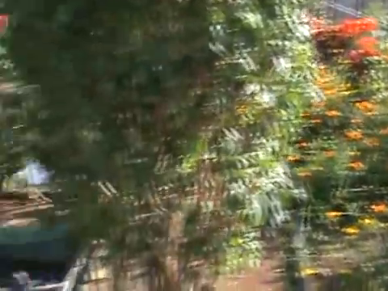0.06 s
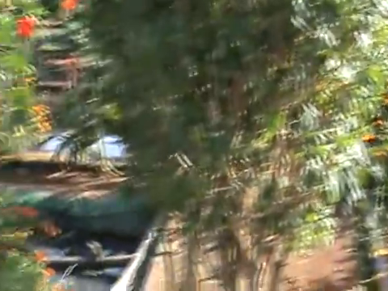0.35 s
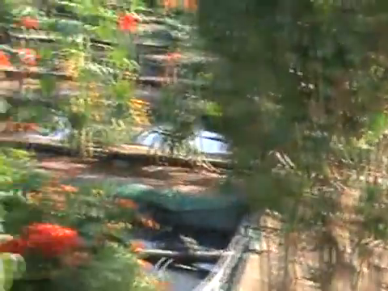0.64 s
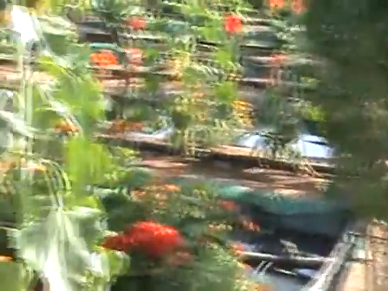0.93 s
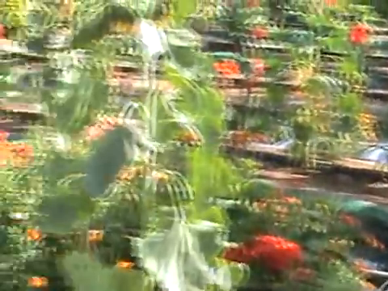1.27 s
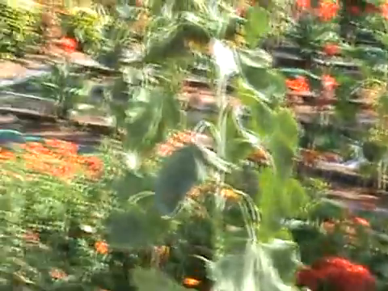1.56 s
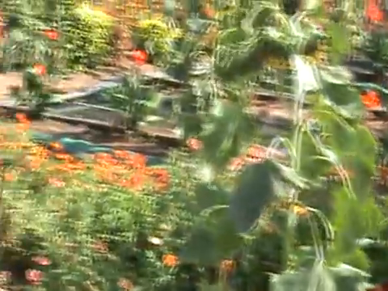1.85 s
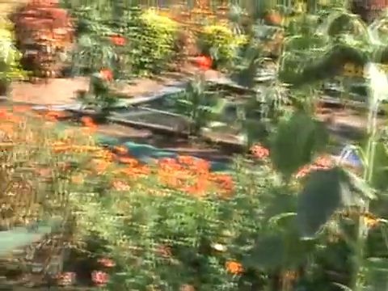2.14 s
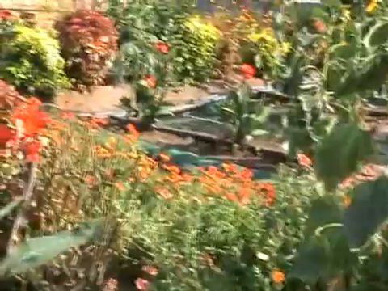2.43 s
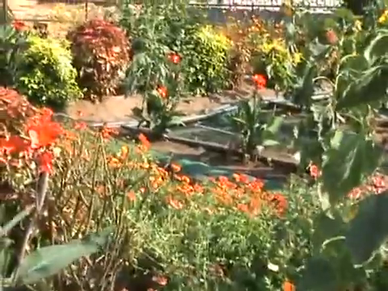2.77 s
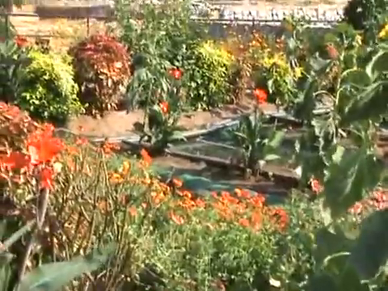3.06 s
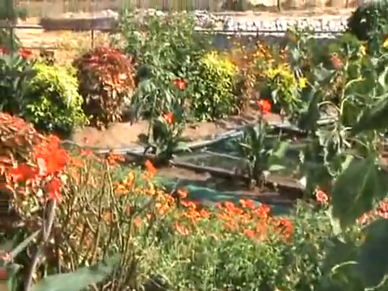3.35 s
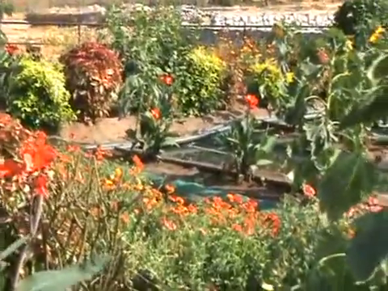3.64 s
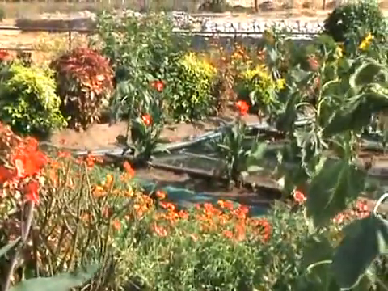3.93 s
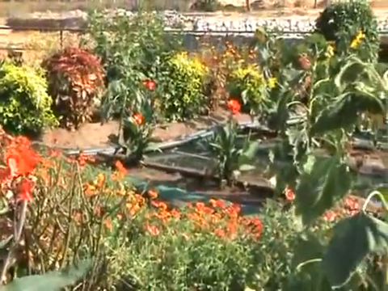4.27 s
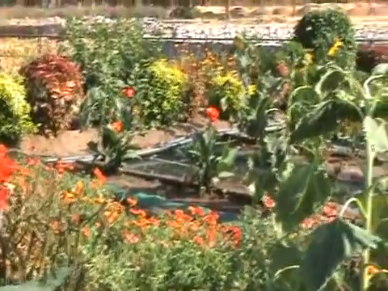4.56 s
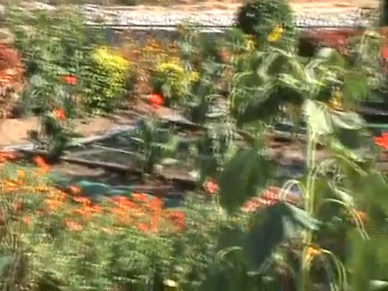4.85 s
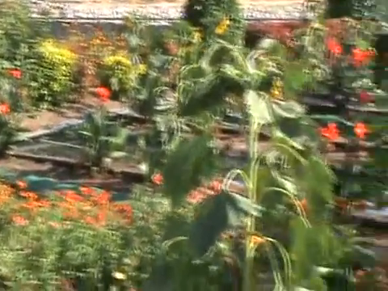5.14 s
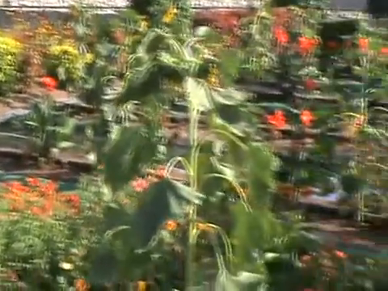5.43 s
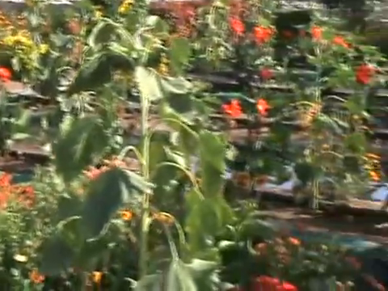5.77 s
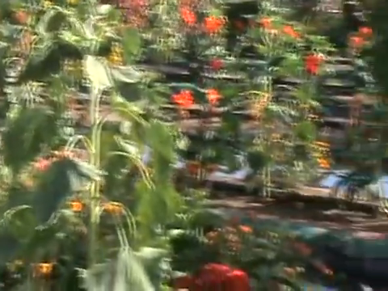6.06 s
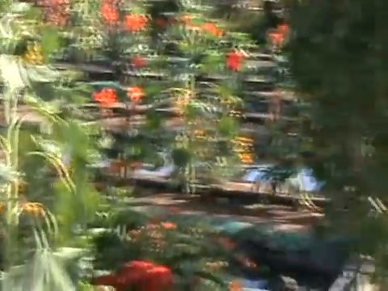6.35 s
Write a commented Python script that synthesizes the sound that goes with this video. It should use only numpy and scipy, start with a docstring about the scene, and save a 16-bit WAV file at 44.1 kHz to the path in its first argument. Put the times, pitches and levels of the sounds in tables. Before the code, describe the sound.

Water pours and splashes steadily outdoors among planted beds for about six and a half seconds. A high hiss of spray and fine drops flutters and surges over a bubbling rush and a deep, uneven churn that burbles and briefly drops out. For the first second the water is duller and boxier, screened by a bush. It grows brighter and a little louder until about 2.5 seconds, with a slightly hollow middle, holds there, then eases after 5.6 seconds. Small wet slaps, ringing drips, sharp little ticks and faint gulps are scattered through the flow, with a clearer tick at 1.2 seconds and a plink near 2.2. Light wind rumbles on the hand-held microphone, with a puff and soft handling bumps around 0.5 to 0.6 seconds, another bump near 4.1, and weaker puffs in between and near 4.5.

```python
"""Outdoors by planted beds, water pours and splashes steadily: a surging high hiss of spray and drops
over a rush of ringing bubbles and a deep churn. A bush screens the treble at first; the echo off a hard
surface close to the microphone hollows the midrange. Light air and the moving hand rumble on the
hand-held microphone, and the camera's noise suppressor makes the low water burble."""
import sys
import numpy as np
from scipy import signal
from scipy.fft import rfft, irfft, next_fast_len
from scipy.io import wavfile
from scipy.ndimage import uniform_filter1d, map_coordinates

SR = 44100
rng = np.random.default_rng(int(sys.argv[2]) if len(sys.argv) > 2 else 0)


def waveform_to_disk(signal):
    """Save audio, clipped to [-1, 1], as 16-bit WAV at the path in sys.argv[1]."""
    frames = np.transpose(np.atleast_2d(signal))
    scaled = np.clip(frames, -1, 1) * 32767
    samples = np.round(scaled).astype(np.int16)
    wavfile.write(sys.argv[1], SR, samples)


N = 282240


# the bright colour of the spray: f/Hz, level/dB
SPRAY_COLOUR = [(250, -33), (1500, -8.5), (2200, -5), (3050, -4), (3500, -1), (4500, 0.5), (5300, 1.2),
                (6900, 3.5), (8200, 2.5), (9000, -1), (9800, -12), (11000, -22), (13000, -45), (14500, -70)]
# the spray comes out from behind the bush and recedes again: t/s, level/dB
SPRAY_FADER = [(0, -26.5), (.75, -26), (1.5, -24), (2.2, -22.5), (2.5, -21.5), (3.2, -21.5), (4.1, -22.5),
               (5.6, -22.5), (6.4, -25)]
def spray(flow_db):
    """Drops tick on a sheet of hiss, the tiny bubbles they trap tinkle, and heavier drops patter."""
    drops = grains(2360, 7960, cycles=0.63, heft_db=0, rise=0.028, count=16000, samples=70)
    tinkle = grains(1803, 8980, cycles=33, heft_db=0.5, rise=0.0014, count=3200, samples=600)
    patter = grains(1496, 6510, cycles=7, heft_db=1.5, rise=0.003, count=900, samples=500)
    hiss = patchy_noise(patchy_db=0.7) + amp(-6) * drops + amp(-8) * tinkle + amp(-14) * patter
    return stereo(hiss, SPRAY_COLOUR) * amp(curve(SPRAY_FADER) + flow_db + 0.29 * wobble(28))


# the airy top of the mist: f/Hz, level/dB
MIST_COLOUR = [(5000, -46), (8000, -10.5), (9000, 0.5), (9800, 2.2), (10900, 4), (11800, 0), (12500, -3),
               (13200, -9), (13700, -35), (14300, -48)]
# the mist opens up where no leaves are in the way: t/s, level/dB
MIST_FADER = [(0, -37), (.6, -38.5), (1.05, -34.5), (1.45, -31.5), (2.1, -36), (2.6, -30.5), (3.7, -31),
              (4.2, -29.5), (5, -30), (5.4, -31), (5.9, -32), (6.4, -35.5)]
def mist(flow_db):
    """The finest droplets sizzle above the spray; the leaves screen them most."""
    sizzle = stereo(patchy_noise(patchy_db=2.5), MIST_COLOUR)
    return sizzle * amp(curve(MIST_FADER) + flow_db + 0.54 * wobble(23.6))


# the rush in the open: f/Hz, level/dB
OPEN_COLOUR = [(250, -57), (340, -12), (390, -7), (455, 1.5), (570, 1), (660, 1.5), (850, 3.5), (1050, 1.5),
               (1300, 0), (1700, 0), (2100, 0), (2800, 0), (5000, -5), (9000, -60)]
# the duller, boxier rush from behind the bush: f/Hz, level/dB
SCREENED_COLOUR = [(250, -59), (340, -0.5), (410, -6), (600, -5), (800, -2.5), (1000, -5.5), (1170, -10),
                   (1400, -2.5), (1650, -8.5), (2000, -5.5), (2800, -5.5), (5000, -10), (9000, -60)]
def rush(flow_db, facing):
    """Crowds of short-lived bubbles ring in the froth, which follows the surges only in part."""
    bubbles = grains(1002.5, 3182, cycles=13.4, heft_db=0.6, rise=0.0055, count=2500, samples=900)
    burble = grains(382.3, 1101.6, cycles=20.6, heft_db=-1, rise=0.0059, count=700, samples=2000)
    froth = patchy_noise(patchy_db=1.1) + amp(-13) * bubbles + amp(-18.5) * burble
    coloured = facing * stereo(froth, OPEN_COLOUR) + (1 - facing) * stereo(froth, SCREENED_COLOUR)
    return coloured * amp(-30 + 0.58 * flow_db)


# the low body of the pour: f/Hz, level/dB
CHURN_COLOUR = [(60, -22), (120, -16.5), (165, -8.5), (220, -1), (290, 2), (350, 2.5), (440, 2), (520, 3),
                (900, -50)]
# the churn swells and sinks: t/s, level/dB
CHURN_FADER = [(0, -40), (.7, -41), (1.1, -42), (1.5, -38.5), (2.15, -40.5), (3, -45), (4, -41.5),
               (4.8, -43), (5.5, -45), (5.9, -39.5), (6.12, -40), (6.4, -43)]
def churn():
    """Large bubbles boil unevenly and glug in bursts around one deep pitch."""
    boil = stereo(patchy_noise(patchy_db=3.5), CHURN_COLOUR)
    level = amp(curve(CHURN_FADER) + 0.55 * wobble(16))
    bursts = 1 + np.tanh(1.8 * wobble(22))
    glugs = unit(bursts * narrow_noise(centre_hz=174.3, width_hz=42))
    return level * (boil + amp(-7) * glugs)


def gurgling(hz, t, power, depth_db=1.5, reach_hz=620):
    """Bubbles come in clumps: a gain that breaks the low water into lumps and gaps."""
    clumps = patches((len(hz), len(t)), bins=4, frames=8)
    gain = amp(depth_db * np.minimum(clumps, 1) / (1 + (hz / reach_hz) ** 4))
    return gain / np.sqrt(np.mean(gain ** 2, axis=1, keepdims=True))


# the flow spurts or slackens for a moment: t/s, change/dB, length/s
SPURTS = [(.177, -2, .018), (.262, 1.2, .02), (.405, -2.5, 0.017), (.635, 4, 0.014), (.7, -0.5, 0.042),
          (.759, 3.5, 0.0074), (1.08, 0.6, 0.052), (1.19, -2, .011), (1.41, 1.5, 0.019), (1.574, -2, .016),
          (1.9, 2.5, 0.016), (2.05, 0.5, .018), (2.13, -1.3, 0.048), (2.255, -4.5, 0.015),
          (2.3, -3, 0.0086), (2.47, 1.4, 0.032), (2.672, -1.6, .018), (2.92, 1.5, 0.016),
          (3.039, -1.5, 0.011), (3.27, 0.5, .018), (3.5, -2.5, .027), (3.712, 1, 0.013), (3.875, -3, 0.018),
          (4.356, -2, .02), (4.45, -2.5, 0.018), (4.633, -0.8, 0.013), (4.85, -2, 0.017),
          (4.962, -1, 0.013), (5.01, 2, .02), (5.28, -2.3, 0.041), (5.37, -3, 0.013), (5.555, 2, .02),
          (5.808, 2.5, 0.022), (6.023, -3, 0.014), (6.095, -4.5, 0.01), (6.145, 3.5, .02),
          (6.223, -2.5, .015), (6.275, 2.7, 0.011)]
def flow():
    """Spurts and landing clumps of water make the level surge, in dB per sample."""
    return sum(db * hump(s, length) for s, db, length in SPURTS) + 0.77 * wobble(120)


# accents of falling water: t/s, relative level/dB
SLAP_HITS = [(0.932, -11.5), (1.34, -12), (1.6297, -30), (2.045, -11), (2.212, -14), (3.68, -12.5),
             (3.911, -11), (4.48, -14), (5.5458, -11), (5.768, -13), (6.259, -10.5)]
# the wet smack of a slap: f/Hz, level/dB
SLAP_COLOUR = [(400, -25), (900, 1), (1400, 6), (3000, 10), (4500, 10), (8000, -2), (13000, -40)]
def slaps(attack_s=0.0045, trim_db=-11.5):
    """A lump of water bursts in a brief, fuller splash."""
    age = np.arange(SR // 10) / SR / attack_s
    envelope = np.zeros(N + len(age))
    for s, db in SLAP_HITS:
        envelope[int(s * SR):][:len(age)] += amp(db + trim_db) * age * np.exp(1 - age)
    return envelope[:N] * stereo(rng.standard_normal((2, N)), SLAP_COLOUR)


# close drops that ring clearly: t/s, level/dB, f/Hz
PLINKS = [(.755, -16, 6300), (1.411, -17, 1460), (1.63, -13, 3445), (1.891, -19, 3190), (2.22, -10, 4307),
          (2.447, -19, 3790), (3.914, -16, 2050), (4.012, -18, 2860), (6.117, -20, 1550),
          (6.135, -16, 2700), (6.151, -19, 2584)]
def plinks(attack_s=0.00033, decay_s=0.0024, rise_per_s=1.5):
    """A drop on water traps a bubble, whose ring climbs slightly as it dies."""
    t = np.arange(SR // 20) / SR
    envelope = np.exp(-t / decay_s) * (1 - np.exp(-t / attack_s))
    rings = np.zeros(N + len(t))
    for s, db, hz in PLINKS:
        ring = np.sin(2 * np.pi * hz * t * (1 + rise_per_s * t / 2))
        rings[int(s * SR):][:len(t)] += amp(db) * envelope * ring
    return rings[:N]


# sharp close ticks: t/s, level/dB
LEAF_TICKS = [(.806, -15), (1.2098, -8), (2.796, -17), (3.36, -15), (3.479, -13), (4.62, -16),
              (5.729, -13.5), (6.023, -15)]
def leaf_ticks(hz=8000, length_s=0.00009):
    """A drop on a leaf only ticks, for about one cycle."""
    return blips([(s, db, hz, length_s) for s, db in LEAF_TICKS])


# hollow gulps: t/s, level/dB, f/Hz, length/s
GULPS = [(.087, -32.5, 720, .02), (.14, -29, 406, 0.0093), (.163, -24, 440, 0.0078), (.197, -32, 573, .011),
         (.293, -32, 600, .012), (.47, -32, 613, 0.0098), (.84, -32, 431, 0.014), (1.416, -29, 480, 0.0098),
         (2.025, -33.5, 140, 0.015), (2.068, -29.5, 158, 0.023), (2.125, -36.5, 163, 0.028),
         (2.255, -32, 182, 0.005), (3.071, -31, 850, .009), (3.332, -36, 440, 0.0094),
         (3.439, -30, 513, 0.01), (3.643, -34, 386, .012), (3.73, -28, 560, .011), (4.165, -40, 786, 0.011),
         (4.316, -34, 467, .012), (4.917, -32, 826, .01), (5.059, -31, 345, 0.0084),
         (5.071, -31, 477, 0.014), (5.939, -33.5, 345, 0.01), (6.037, -30, 357, 0.0072)]
def gulps():
    """The pour gulps in short notes that bend upward."""
    return blips(GULPS, rise_per_s=1.6)


# how clearly the hollow sings through: t/s, level/dB
HOLLOW_FADER = [(0, -53), (.25, -41.5), (.7, -43), (1.05, -44), (1.25, -52.5), (6.4, -41)]
def hollow():
    """The falling water excites one narrow resonance in fits: a faint, broken note."""
    fits = 1 + np.tanh(wobble(18))
    return amp(curve(HOLLOW_FADER)) * unit(fits * narrow_noise(centre_hz=589, width_hz=60))


# puffs of air: t/s, level/dB, length/s
GUSTS = [(0.154, -47.5, 0.19), (0.533, -30.5, 0.033), (.625, -35, 0.033), (0.862, -49, .2),
         (2.094, -43, 0.06), (2.58, -45, .1), (2.817, -42, 0.032), (3.387, -57, .02), (3.76, -41, 0.036),
         (3.89, -49, .03), (4.05, -57, .2), (4.42, -47, .029), (4.554, -39, 0.051), (4.726, -50, 0.07),
         (5.517, -47, .013), (6.097, -49.5, .045)]
# the rumble of the air: f/Hz, level/dB
WIND_COLOUR = [(10, -42), (30, -14), (50, -10.5), (70, -8), (105, -6.5), (200, -14), (600, -65)]
# how alike the rumble is left and right: f/Hz, likeness/0-1
WIND_LIKENESS = [(40, 0.5), (90, 0.5), (180, 0)]
def wind(calm_db=-56):
    """Puffs of air over a faint draught buffet the microphone's two ports."""
    draught = amp(calm_db + 2.6 * wobble(16))
    puffs = sum(amp(db) * hump(s, length) for s, db, length in GUSTS)
    flutter = amp(2.5 * wobble(24.9))
    return (draught + puffs) * flutter * stereo(rng.standard_normal((2, N)), WIND_COLOUR, WIND_LIKENESS)


# soft handling thumps: t/s, level/dB, f/Hz, length/s
HAND_BUMPS = [(.497, -38, 85, .008), (.537, -29, 66, .011), (.537, -32, 154, 0.015), (.628, -32, 66, .011),
              (.622, -36, 151, 0.014), (4.11, -24.5, 69.6, 0.0043)]
def hand_bumps():
    """The moving hand bumps the microphone's body."""
    return blips(HAND_BUMPS)


def near_echo(x, delay_s, strength, dull_hz):
    """One close reflection, dull and inverted; beside the direct sound it cuts evenly spaced dips."""
    echo = lambda hz: -strength * np.exp(-2j * np.pi * hz * delay_s) / (1 + (hz / dull_hz) ** 4)
    return filtered(x, echo)


# brief ducks in the low end: t/s, change/dB, length/s, from f/Hz, up to f/Hz
LOW_DIPS = [(.37, -13, 0.031, 0, 100), (1.204, -17, 0.018, 0, 260), (1.355, -14, 0.011, 0, 230),
            (1.454, -9, 0.043, 2, 230), (1.936, -9, 0.076, 2, 330), (2.34, -15, 0.033, 3, 377),
            (2.445, -15, .017, 0, 403), (2.748, -12, 0.015, 0, 300), (2.81, -10, 0.022, 0, 330),
            (2.9, -24, 0.025, 370, 690), (2.933, -21, 0.024, 0, 320), (3.23, -21, 0.034, 3, 300),
            (3.323, -13, 0.042, 0, 200), (3.39, -4, .025, 150, 760), (3.445, -6, 0.024, 0, 130),
            (4.26, -17, 0.03, 0, 170), (4.677, -10, 0.025, 150, 774), (4.82, -12, 0.015, 300, 750),
            (4.92, -12, 0.02, -3, 170), (5.022, -15, 0.037, 2, 360), (5.482, -8, 0.013, 250, 780),
            (5.873, -7.5, 0.12, 10, 270)]
def low_dips(hz, t, power):
    """A gain that sinks the low end for a moment, each time between different pitches."""
    change_db = 0
    for s, db, length, lo_hz, hi_hz in LOW_DIPS:
        band = 1 / (1 + (hz / hi_hz) ** 8) / (1 + (lo_hz / (hz + 1)) ** 8)
        change_db += db * np.exp(-((t - s) / length) ** 2) * band
    return amp(change_db)


def suppressor(hz, t, power, cut_db=-18, reach_hz=820, knee_db=-10.5):
    """A gain that turns low bands down when they fall well under their usual level."""
    smoothed = np.abs(uniform_filter1d(power, size=3, axis=1))
    threshold = np.median(smoothed, axis=1, keepdims=True) * amp(knee_db) ** 2 + 1e-20
    return amp(cut_db / (1 + (smoothed / threshold) ** 2) / (1 + (hz / reach_hz) ** 4))


# how alike the water is left and right: f/Hz, likeness/0-1
WATER_LIKENESS = [(50, 0), (130, 0.8), (300, 0.7), (800, 0.57), (1200, 0.28), (2000, 0.57), (4000, 0.67),
                  (7000, 0.78), (10000, .58), (13000, 0.15)]
def stereo(pair, colour, likeness=WATER_LIKENESS):
    """Two unrelated streams become a coloured left and right, their middle at rms 1."""
    def response(hz):
        width = np.arccos(np.clip(along(likeness, hz), -1, 1)) / 2
        return amp(along(colour, hz)) * [np.cos(width), np.sin(width)]
    mid, side = filtered(pair, response)
    return np.array([mid + side, mid - side]) / np.std(mid)


def grains(lo_hz, hi_hz, cycles, heft_db, rise, count, samples):
    """Two streams of damped rings at random times and pitches; heft_db scatters their levels."""
    when, pitch, heft, life, stream = rng.random((count, 5)).T[:, :, None]
    hz = lo_hz * (hi_hz / lo_hz) ** pitch
    turns = hz * np.arange(samples) / SR
    age = turns / (cycles * (0.5 + life))
    level = amp(heft_db * np.minimum(-np.log(1 - heft), 5))
    rings = level * np.exp(-age) * np.sin(2 * np.pi * turns * (1 + rise * age))
    at = (when * N).astype(int) + np.arange(samples) + (stream > 0.5) * (N + samples)
    streams = np.bincount(at.ravel(), rings.ravel(), 2 * (N + samples)).reshape(2, -1)
    return unit(streams[:, :N])


def blips(rows, rise_per_s=0):
    """Short tones that swell and fade, their pitch climbing by a share a second."""
    t = np.arange(N) / SR
    tones = np.zeros(N)
    for s, db, hz, length in rows:
        turns = hz * (t - s) * (1 + rise_per_s * (t - s) / 2)
        tones += amp(db) * hump(s, length) * np.cos(2 * np.pi * turns)
    return tones


def patchy_noise(patchy_db):
    """Two noises with shared patches of random gain in time and pitch."""
    spectra = signal.stft(rng.standard_normal((2, N)), nperseg=512)[2]
    gain = amp(patchy_db * patches(spectra.shape[1:], bins=6, frames=10))
    return unit(signal.istft(spectra * gain, nperseg=512)[1][:, :N])


def patches(shape, bins, frames):
    """A random field smoothed over pitch and time, rms 1."""
    field = uniform_filter1d(rng.standard_normal(shape), size=bins, axis=0)
    return unit(uniform_filter1d(field, size=frames, axis=1))


def narrow_noise(centre_hz, width_hz):
    """Noise through one narrow resonance, rms 1."""
    resonance = lambda hz: 1 / (1 + (2 * (hz - centre_hz) / width_hz) ** 2)
    return unit(filtered(rng.standard_normal(N), resonance))


def filtered(x, response):
    """x times a complex response of frequency."""
    size = next_fast_len(N + SR // 2)
    return irfft(rfft(x, size) * response(np.fft.rfftfreq(size, 1 / SR)), size)[..., :N]


def reshaped(x, gain):
    """x under a gain that depends on frequency, time and its own short-time power."""
    hz, t, spectra = signal.stft(x, SR, nperseg=1024, noverlap=768)
    power = np.mean(np.abs(spectra) ** 2, axis=0)
    return signal.istft(spectra * gain(hz[:, None], t, power), SR, nperseg=1024, noverlap=768)[1][:, :N]


def hump(s, length):
    """A smooth rise and fall of height 1 around time s."""
    shape = np.zeros(N)
    near = np.arange(max(int((s - 4 * length) * SR), 0), min(int((s + 4 * length) * SR), N))
    shape[near] = np.exp(-((near / SR - s) / length) ** 2)
    return shape


def wobble(rate):
    """A smooth random curve, rate knots a second."""
    return map_coordinates(rng.standard_normal(4096), [np.arange(N) * rate / SR], mode="wrap")


def curve(points):
    """(t/s, value) points read at every sample."""
    return np.interp(np.arange(N) / SR, *np.transpose(points))


def along(points, hz):
    """(f/Hz, value) points read on a log axis."""
    knots_hz, values = np.transpose(points)
    return np.interp(np.log(hz + 1), np.log(knots_hz + 1), values)


def amp(db):
    """Decibels to gain."""
    return 10 ** (np.asarray(db) / 20)


def unit(x):
    """Scaled to rms 1."""
    return x / np.sqrt(np.mean(x ** 2) + 1e-20)


# how squarely the microphone faces the near water: t/s, share/0-1
FACING = [(0, 0), (.9, 0.1), (1.5, 0.33), (2.2, 1), (3.2, 1), (4.5, 1), (5.6, 0.68), (6.4, 0.54)]
# the pan of each band: f/Hz, left minus right/dB
PAN = [(70, -2.5), (200, 2), (450, 2.5), (650, 3.5), (1100, 6.5), (1700, 3), (2300, .5), (7000, 0.3),
       (10000, 0.5), (12500, -2.5)]
def scene():
    """Facing the water, each port gets its own close echo; the midrange leans left."""
    flow_db = flow()
    facing = np.clip(curve(FACING), 0, 1)
    splash = spray(flow_db) + mist(flow_db) + slaps() + plinks() + leaf_ticks()
    pour = reshaped(rush(flow_db, facing) + churn(), gurgling) + gulps() + hollow()
    water = splash + pour
    left_echo = near_echo(water[0], delay_s=0.001632, strength=0.28, dull_hz=3900)
    right_echo = near_echo(water[1], delay_s=0.001674, strength=0.59, dull_hz=1710)
    mix = water + facing * np.array([left_echo, right_echo]) + wind() + hand_bumps()
    ducked = reshaped(mix, low_dips)
    return filtered(ducked, lambda hz: amp(along(PAN, hz) * np.array([[0.5], [-0.5]])))


def record(dry):
    """The camera suppresses weak low noise and keeps nothing above its band limit."""
    return filtered(reshaped(dry, suppressor), lambda hz: hz < 15800)


dry = scene()
out = record(dry)
waveform_to_disk(out)
```